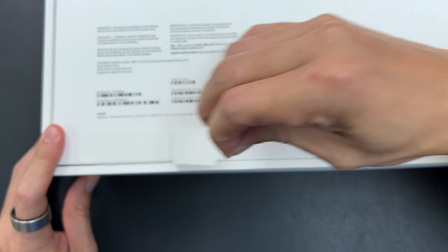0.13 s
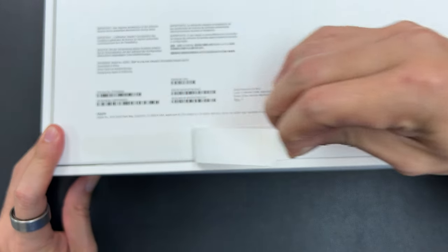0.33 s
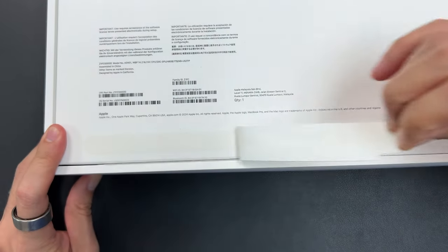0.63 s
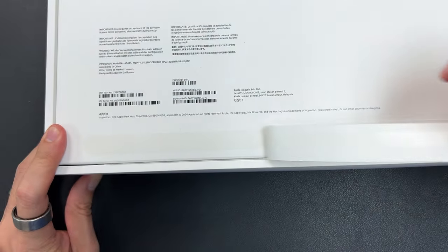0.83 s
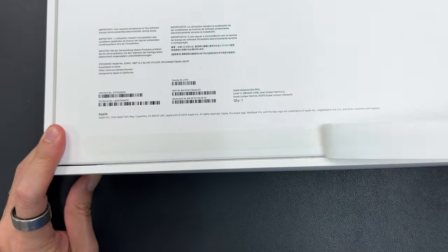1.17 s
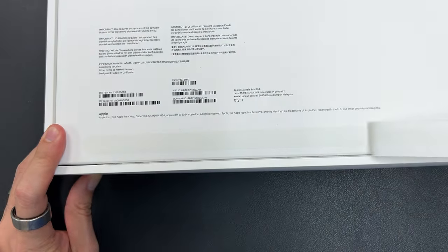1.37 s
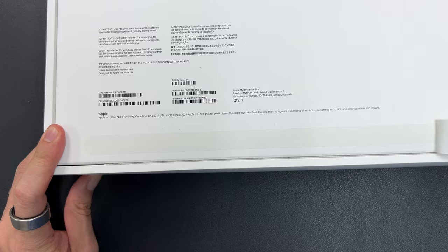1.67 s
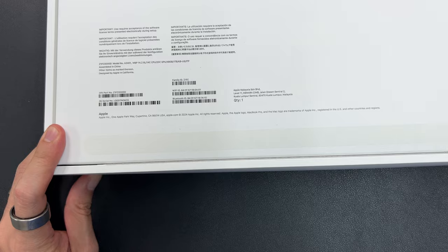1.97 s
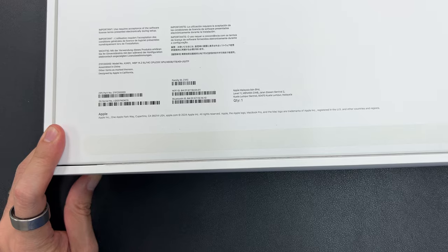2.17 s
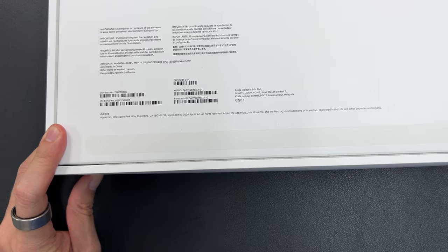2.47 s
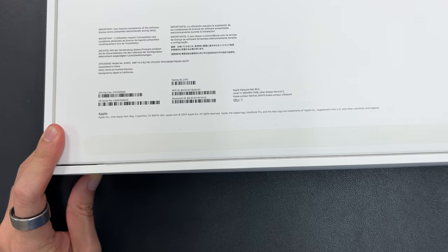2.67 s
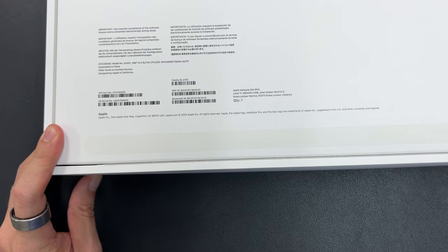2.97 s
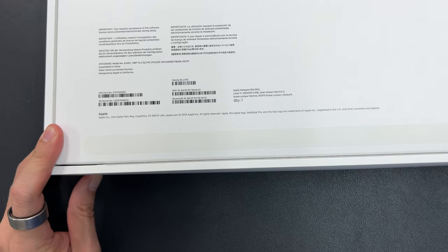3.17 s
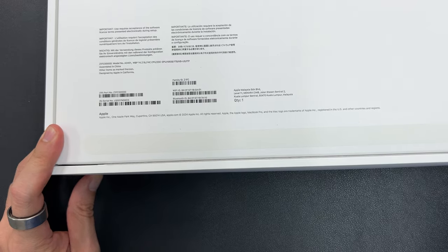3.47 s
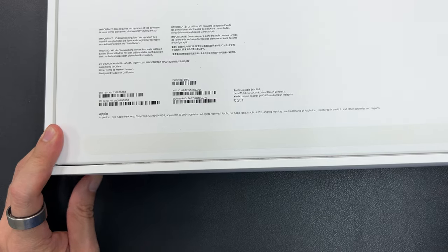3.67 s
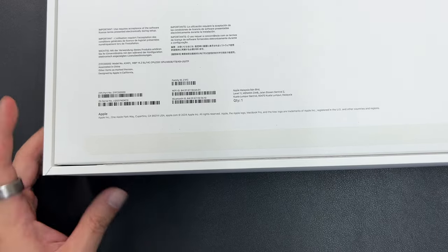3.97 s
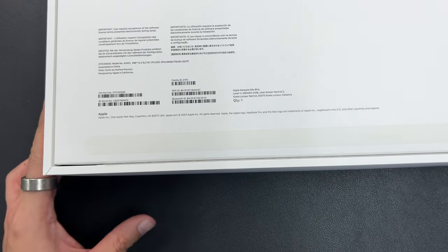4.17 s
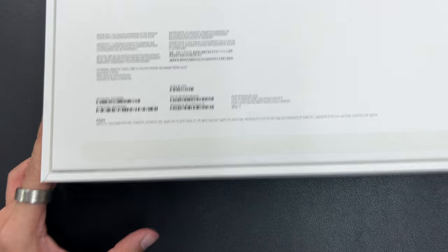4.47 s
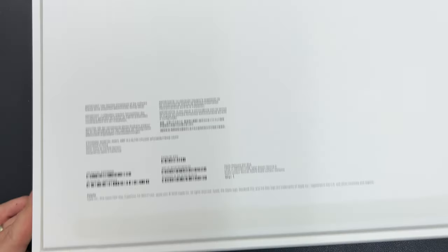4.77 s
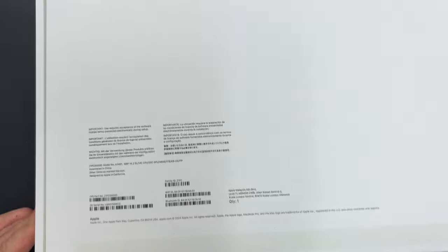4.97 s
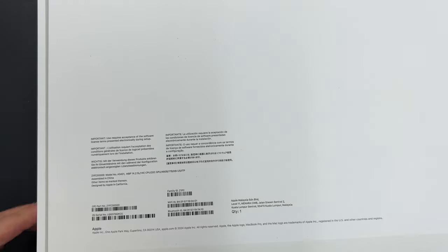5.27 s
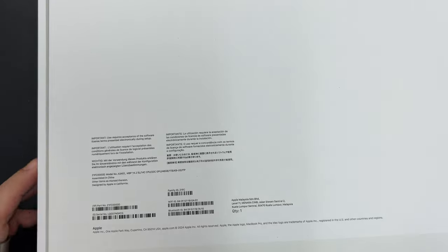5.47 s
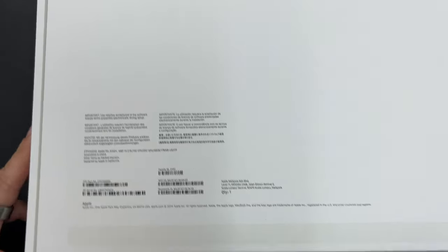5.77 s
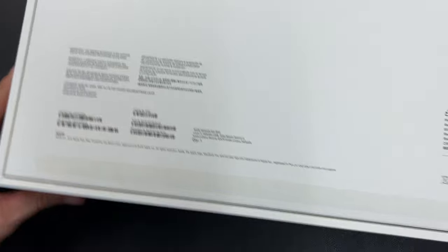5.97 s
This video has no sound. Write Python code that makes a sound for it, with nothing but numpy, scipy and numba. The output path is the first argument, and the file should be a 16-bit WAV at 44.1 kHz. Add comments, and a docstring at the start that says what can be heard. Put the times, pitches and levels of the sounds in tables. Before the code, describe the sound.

From the start, a paper tear-strip is pulled along a large cardboard box, close to the microphone. It rasps and crackles in quick, uneven slips, with a papery ring that falls in pitch as the strip lengthens and a growing hollow drumming from the lid. At about 2.3 seconds the end comes free with a sharp, bright snap. A pause of about a second follows. From 3.5 seconds fingers brush and tap the box, making light clicks and small creaks, the sharpest near 3.6 and 4.3 seconds. The box slides softly over a desk mat from about 4.4 seconds. A tiny click and faint fingertip brushes come after 5.2 seconds, then a second soft slide swells from 5.5 to about 6 seconds. Faint fan air and a low electrical hum fill the small room throughout.

```python
"""A large cardboard box on a desk mat, close to a two-port stereo microphone, in a small humming room.
First a paper tear-strip is pulled: fibres part in uneven slips that shake the lid and the lengthening
strip, until its end snaps free at 2.3 s. From about 3.5 s fingers brush, tap and shift the box, and it
slides over the mat at 4.4 s and again at 5.5 s. Fan air and mains hum lie underneath throughout."""
import sys
import numpy as np
from scipy import signal
from scipy.fft import rfft, irfft, next_fast_len
from scipy.io import wavfile
from scipy.ndimage import uniform_filter1d
from numba import njit

SR = 44100
rng = np.random.default_rng(int(sys.argv[2]) if len(sys.argv) > 2 else 0)


def write(x):
    x = np.atleast_2d(x).T
    wavfile.write(sys.argv[1], SR, np.round(np.clip(x, -1, 1) * 32767).astype(np.int16))


N = 269495
T = np.arange(N) / SR
SIZE = next_fast_len(N + SR, real=True)
F = np.arange(SIZE // 2 + 1) * SR / SIZE + 1e-3

# how hard the hand pulls, heard as crackle: time_s, relative_db
HAND_PULL = [(0, -42), (0.24, -40.5), (0.42, -41), (0.54, -37), (0.66, -44.5), (0.84, -35.5), (0.93, -46),
             (1.0, -40), (1.08, -39.5), (1.22, -38), (1.52, -36.5), (1.7, -41.5), (1.96, -39.5),
             (2.03, -38.5), (2.14, -43.5), (2.26, -41.5), (2.295, -32.5)]
# the strongest slips of the tear: peak_s, relative_db, lid_jolt_db, treble_tilt_db
STRONG_SLIPS = [(0.0395, -34, -56, 18), (0.0494, -34, -60, 7), (0.0974, -31.5, -46, -3),
                (0.1337, -28, -55, 3), (0.1871, -30.5, -42, 8), (.222, -32, -53, 7), (0.231, -29, -62, -1),
                (0.269, -26, -64, 9), (0.327, -35, -54, 9), (0.3446, -30, -66, -8), (0.4516, -35, -64, -5),
                (0.491, -30.5, -54, -8), (0.5256, -26, -58, -3), (0.534, -32, -60, -2),
                (0.5546, -25, -43, 2), (0.5638, -26, -42, 4), (0.5977, -24, -49, 7), (0.604, -26, -44, 0),
                (0.623, -35, -62, 9), (0.6767, -28.5, -60, -2), (0.7276, -26, -38, 0),
                (0.7562, -24, -64, 3), (0.8351, -34.5, -41, -5), (0.927, -28, -70, 1),
                (1.0033, -33, -43, -8), (1.045, -30.5, -44, -8), (1.0764, -32.5, -56, -8),
                (1.0866, -28, -62, -4), (1.103, -28, -39, -1), (1.1145, -27.5, -35.5, -8.5),
                (1.1398, -23.5, -45, -7), (1.155, -33, -48, -5), (1.1694, -35, -40, -7),
                (1.1931, -33, -40.5, -13), (1.232, -32, -44, 5), (1.2535, -26.5, -56, -1),
                (1.2624, -27, -45, -4), (1.288, -30.5, -43, -1), (1.3129, -27.5, -52, -5),
                (1.3267, -26, -50, 5), (1.348, -34.5, -48, -12), (1.4148, -25, -39, 4),
                (1.421, -26, -39, -9), (1.4543, -24, -36, 2), (1.5033, -32, -37.5, -13),
                (1.508, -34, -47, 0), (1.5383, -31.5, -54, 3), (1.5803, -29.5, -39.5, -8),
                (1.588, -30, -56, 9), (1.614, -25.5, -49, -2), (1.6265, -30, -53, -11),
                (1.6997, -25.5, -42.5, -1), (1.7178, -32, -43, -3), (1.7451, -31, -53, -14),
                (1.7602, -26.5, -49, -1), (1.7821, -30, -54, 5), (1.7882, -34, -39.5, 10),
                (1.8405, -27, -38.5, 0), (1.9195, -32, -61, -5), (1.9683, -32, -59, -7),
                (1.9872, -25, -40, -5), (2.0203, -30, -51, 3), (2.0311, -26, -41, -6),
                (2.038, -26, -41, -9), (2.0453, -30, -37, -1), (2.0734, -27, -45, -2),
                (2.0824, -32, -52, 3), (2.1112, -31, -41, -5), (2.241, -28, -46, 5), (2.2788, -28, -47, 1)]
# tone of the snapping fibres: frequency_hz, gain_db
FIBRE_SPECTRUM = [(300, -2), (1000, -9.5), (1750, -5.5), (2200, -0.5), (2900, -5.5), (3400, -0.5),
                  (4100, -4), (5800, -4.5), (8000, -3), (11000, -7), (15500, -2.5)]
# the paper's top hiss, highest while the strip runs fastest: time_s, gain_db
PAPER_SHEEN = [(0, 2.5), (.9, -3), (1.1, 5), (1.5, 0.5), (1.8, -1.5)]
# resonances of the paper wrap: pitch_hz, width_hz, gain_db
WRAP_MODES = [(2140, 110, -8.5), (2810, 72, 0.5), (3360, 410, 2), (4150, 75, -11), (4870, 66, -8),
              (8300, 160, -14)]
# how freely the wrap rings, dipping as the tear nears the corner: time_s, gain_db
WRAP_RING = [(0, -12), (.5, 3.5), (1.55, 3.5), (1.7, -29), (2.3, 3)]
# the freed strip rings lower as it lengthens: time_s, pitch_hz, gain_db
STRIP_GLIDE = [(0, 2110, -50), (.55, 1650, -21.5), (.85, 1250, -21.5), (1.13, 980, -19.5), (1.3, 1000, -11),
               (1.42, 670, -15.5), (1.58, 535, -20), (1.72, 365, -24.5), (2.3, 355, -17)]
# the strip's edge sings, most strongly near the end of its run: time_s, pitch_hz, gain_db
EDGE_GLIDE = [(0.4, 4250, -24), (.6, 4500, -14.5), (1.55, 4480, -26), (1.74, 4540, -3.5), (1.9, 4800, -23),
              (2.0, 5470, -8.5), (2.2, 5300, -8), (2.27, 4540, -4)]
# the lid and the air behind it: pitch_hz, width_hz, gain_db
LID_MODES = [(310, 18, -19), (371.5, 76, 5), (515, 150, 1), (850, 75, -5), (1100, 1200, -3),
             (1596, 75, 2.5)]
# the strip's end tugs the lid and snaps free; a short, bright tail follows:
# start_s, force_db, low_hz, high_hz, crunch_decay_s, body_gain_db
RELEASE_SNAPS = [(2.2878, -13, 900, 5000, 0.003, 2), (2.296, -5.5, 3400, 5000, 0.0086, -6),
                 (2.3027, 2.5, 3930, 19500, 0.00025, -17.5), (2.314, -22.5, 3300, 6000, 0.008, 4),
                 (2.3185, -3.5, 3300, 7900, 0.045, -8)]
# the strip's free end: pitch_hz, width_hz, gain_db
STRIP_END_MODES = [(3690, 770, 8.5), (4730, 130, 7)]
# the box corner where the strip lets go: pitch_hz, width_hz, gain_db
CORNER_MODES = [(310, 130, 14.5), (486, 100, 3), (790, 140, 12), (940, 140, 8), (1300, 230, -5),
                (2080, 220, -0.5)]
# taps and creaks of the box: start_s, force_db, low_hz, high_hz, crunch_decay_s, body_gain_db
BOX_TAPS = [(3.6067, -15.5, 2300, 12000, 0.0013, 8), (3.6137, -24.5, 2510, 13000, 0.0012, 2),
            (3.656, -35, 3500, 15000, .001, -1), (3.7542, -18, 5170, 8700, 0.0036, -30),
            (3.7612, -36, 4970, 8950, .003, -25), (3.7785, -40, 5000, 9000, .002, -25),
            (3.8752, -35.5, 3970, 12000, 0.0027, 8), (4.066, -34.5, 1800, 9000, 0.0024, -29),
            (4.2075, -34, 1500, 4500, 0.0011, 7), (4.2203, -17.5, 1200, 2600, 0.0025, -7),
            (4.2333, -33, 2000, 10000, 0.0017, 3), (4.244, -33, 900, 2000, 0.0018, 16.5),
            (4.2603, -6, 2870, 9600, 0.0011, 1.5), (4.3325, -27.5, 1530, 14000, 0.0016, 9.5),
            (4.4088, -32, 900, 7900, 0.0018, 16), (4.4135, -36.5, 900, 7900, .0015, 22),
            (5.2372, -35.5, 3020, 15100, 0.0026, 6.5)]
# the stiff card edge: pitch_hz, width_hz, gain_db
CARD_MODES = [(2480, 1700, 8), (3290, 120, -6), (4470, 1100, 5), (5390, 740, 0), (7100, 740, -2)]
# the hollow box, knocked at its rim: pitch_hz, width_hz, gain_db
RIM_MODES = [(333, 25, 7), (424, 22, 15), (604, 33, 8), (766, 47, 14), (987, 140, 5), (1360, 520, -1),
             (2010, 750, -7)]
# the box slides on the mat: start_s, fastest_s, relative_db
BOX_SLIDES = [(4.382, 4.64, -49.5), (5.528, 6.032, -49.5)]
# tone of card rubbing on the mat: frequency_hz, gain_db
RUB_SPECTRUM = [(300, -7), (800, -10.5), (1500, -10.5), (2150, -14), (2550, -8.5), (2850, -6), (3300, -8.5),
                (6000, -12.5), (9000, -17.5), (12000, -23), (15500, -12.5)]
# fingertips brush the card: middle_s, level_db, swell_and_fade_s
FINGER_BRUSHES = [(3.45, -62.5, .016), (5.32, -62, 0.048), (5.58, -63.5, 0.052), (6.08, -57, 0.11)]
# tone of the room's moving air: frequency_hz, gain_db
AIR_SPECTRUM = [(20, -20), (45, -14), (65, -5.5), (140, -8.5), (300, -11.5), (500, -20), (1000, -25.5),
                (2000, -37), (3950, -43), (4280, -32), (4650, -47.5), (7800, -36.5), (9300, -52.5),
                (15500, -54.5)]
# fan and mains hum: pitch_hz, level_db, unsteadiness (0-1)
HUM_LINES = [(65, -51, 0.41), (99.9, -47.5, 0.14), (119.5, -57.5, 0.49), (201.2, -51.5, 0.24),
             (297.7, -65.5, 0.08), (700.3, -69, 0.14)]
# diffuse sound that differs between the microphone's ports: frequency_hz, power_share (0-1)
DIFFUSE_SPREAD = [(100, .001), (220, .005), (400, .08), (750, .3), (1600, .16), (3500, .35), (7000, .15),
                  (15000, .15)]
# phase between the ports: frequency_hz, left_lead_rad
PORT_LEAD = [(0, 0), (1460, -0.4), (2760, 2.1), (5080, 1.1), (5770, 2.9), (7670, 6.0), (8610, 6.8),
             (9730, 8.3), (10900, 10.5), (12100, 12.4), (12900, 12.8), (14600, 15.5), (15600, 16.5),
             (17200, 15.2)]
# balance between the ports: frequency_hz, left_minus_right_db
PORT_BALANCE = [(400, 0), (1500, -.5), (2300, -3), (4500, -2), (6500, .5), (15000, 0)]


def tear(lid_db=-6, overtone_db=-5, sway_s=0.008, scatter=0.38):
    """The strip lets go in bursts of snapping fibres; the same tugs drive its edge, length and the lid."""
    pull_db = curve(HAND_PULL)
    slip_power, jolt_power, cracks, tilt, stuck = strong_slips()
    crackle_power = small_slips(pull_db, stuck)
    effort = np.sqrt(crackle_power + slip_power)
    tilt_db = tilt / (effort ** 2 + 1e-12)
    # the wide lid radiates a little differently towards each port
    snaps = grains(rate=4500, spread_db=1.5) + scatter * rng.standard_normal((2, N))
    crackle = fibre_crackle(snaps * effort + cracks, tilt_db)
    edge = gliding_ring(snaps, EDGE_GLIDE, q=5.5) * effort
    # the lid drums more the harder the pull and the nearer the tear comes to the free corner
    drum = undb(-18.5 + 0.4 * (pull_db - pull_db.max()) + 7.5 * T)
    tug = np.sqrt(crackle_power * drum ** 2 + jolt_power)
    lid_response = unit(resonances(LID_MODES) / (1 + 1j * F / 550))
    lid = through(snaps * tug, lid_response) * undb(lid_db)
    # the loose strip rings on between slips
    sway = np.sqrt(np.abs(uniform_filter1d(effort ** 2 + jolt_power, int(sway_s * SR))))
    strip = gliding_ring(snaps, STRIP_GLIDE, q=7.5)
    strip += undb(overtone_db) * gliding_ring(snaps, STRIP_GLIDE, q=7.5, multiple=2.05)
    return crackle + edge + lid + strip * sway


def strong_slips(burst_db=-8.5, crack_db=7, jolt_db=4, stick_s=0.014):
    """The strip holds fast for a moment, then a whole fibre bundle breaks and jolts the lid."""
    power, jolts, cracks, tilts, stuck = np.zeros((5, N))
    for peak_s, db, lid_db, treble_db in STRONG_SLIPS:
        peak = int(peak_s * SR)
        power[peak] = undb(db + burst_db) ** 2
        jolts[peak] = undb(lid_db + jolt_db) ** 2
        cracks[peak] = undb(db + crack_db)
        tilts[peak] = power[peak] * treble_db
        stuck[max(peak - int(stick_s * SR), 0):peak] = 1
    return np.abs(bursts(power)), np.abs(bursts(jolts)), cracks, bursts(tilts), stuck


def small_slips(pull_db, stuck, gap_s=0.008, uneven_db=4, creep=0.14, crackle_db=-7, stick_db=-2):
    """Power of the crackle: tension must build after each slip, so gaps are uneven but bounded."""
    gap_draw, size_draw = rng.random((2000, 2)).T
    starts = (np.cumsum(gap_s * (1.5 * gap_draw + .25)) * SR).astype(int)
    sizes = undb(uneven_db * (2 * size_draw - 1))
    slips = np.abs(bursts(np.bincount(starts, sizes ** 2, minlength=N)[:N]))
    drive = undb(pull_db + crackle_db + stick_db * stuck)
    tearing = T < 2.303
    return (creep + slips / slips[:SR].mean()) * drive ** 2 * tearing


def bursts(peaks, swell_s=0.00076, fall_s=0.0016):
    """Each slip's power swells quickly and falls a little more slowly."""
    half = SR // 50
    age = np.arange(-half, half + 1) / SR
    return signal.fftconvolve(peaks, np.exp(-np.maximum(-age / swell_s, age / fall_s)), "same")


def fibre_crackle(snaps, tilt_db, treble_hz=6000, sheen_hz=10000, fibres_db=-2.5):
    """Breaking fibres ring the paper wrap; thin bundles snap brighter, thick ones duller."""
    fibres = through(snaps, unit(colour(FIBRE_SPECTRUM))) * undb(fibres_db)
    treble = through(fibres, 1 / (1 + (treble_hz / F) ** 6))
    bright = undb(tilt_db / 2)
    fibres = treble * bright + (fibres - treble) / bright
    sheen = through(fibres, 1 / (1 + (sheen_hz / F) ** 8))
    fibres += sheen * (undb(curve(PAPER_SHEEN)) - 1)
    wrap = through(fibres * undb(curve(WRAP_RING)), resonances(WRAP_MODES))
    return shimmer(fibres + wrap)


def shimmer(x, depth_db=3, rate_hz=45, count=20):
    """Each band's level flickers quickly on its own, giving the crackle a patchy, shifting colour."""
    place = np.interp(np.log(F), np.log([1000, 15000]), [0, count - 1])
    bands = (through(x, np.maximum(1 - np.abs(place - k), 0)) for k in range(count))
    return sum(band * undb(depth_db * walk(rate_hz)) for band in bands)


def gliding_ring(snaps, glide, q, multiple=1):
    """Fibre snaps ring a resonance of the strip that follows (time_s, pitch_hz, gain_db) points."""
    glide = np.array(glide, float)
    pitch_hz, gain_db = curve(glide[:, :2]), curve(glide[:, ::2])
    ring = gliding_band(snaps.mean(axis=0), multiple * pitch_hz, multiple * q)
    return unit(ring) * undb(gain_db)


def knocks(rows, edge_modes, body_modes, crunch, body_hz=2600):
    """A sharp crack with a brief crunch rings a card edge and the hollow body behind it."""
    cracks, thumps = np.zeros((2, N))
    age = T[:SR // 5]
    for start_s, force_db, low_hz, high_hz, decay_s, body_db in rows:
        force = crunch * rng.standard_normal(len(age)) * np.exp(-age / decay_s)
        force[0] = 1
        force *= undb(force_db) / np.sqrt(np.sum(force ** 2))
        low_cut = signal.butter(2, low_hz, "high", fs=SR, output="sos")
        high_cut = signal.butter(2, high_hz, "low", fs=SR, output="sos")
        span = slice(int(start_s * SR), int(start_s * SR) + len(age))
        cracks[span] += signal.sosfilt(np.vstack([low_cut, low_cut, high_cut]), force)
        thumps[span] += force * undb(body_db)
    edge = through(cracks, 1 + resonances(edge_modes))
    body = through(thumps, resonances(body_modes) / (1 + 1j * F / body_hz))
    return edge + body


def box_slides(gather_db=12.5, loosen_db_per_s=257, coast_db_per_s=41, slide_db=-3, scrape_db=-7):
    """The box breaks loose, gathers speed and coasts to rest, rubbing the mat in fine friction grains."""
    speed = np.zeros(N)
    for start_s, fastest_s, db in BOX_SLIDES:
        gather = np.interp(T, [start_s, fastest_s], [db - gather_db, db])
        loosen = loosen_db_per_s * np.maximum(start_s - T, 0)
        coast = coast_db_per_s * np.maximum(T - fastest_s, 0)
        speed += undb(gather - loosen - coast)
    push = speed * undb(slide_db + 1.5 * walk(33))
    friction = grains(rate=22000, spread_db=-6) + 0.025 * rng.standard_normal((2, N))
    rub = through(friction, colour(RUB_SPECTRUM))
    # the edge catches on the mat's texture
    scrape = through(grains(rate=900, spread_db=4), resonances([(1480, 570, 0)]))
    return (unit(rub) + unit(scrape) * undb(scrape_db)) * push


def finger_brushes(skin_hz=11000, width_hz=9000):
    """Fingertips pass over smooth card: dense friction grains make a faint, high hiss."""
    touch = sum(undb(db) * np.exp(-np.abs(T - s) / fade_s) for s, db, fade_s in FINGER_BRUSHES)
    skin = through(grains(rate=41000, spread_db=10), resonances([(skin_hz, width_hz, 0)]))
    return unit(skin) * touch


def room(x, t60_s=0.32, treble_t60_s=0.37, build_s=0.0036, early_db=-3, early_s=0.0011, dull_hz=10000):
    """Desk and box reflect at once; then the near walls build a short, dense tail with a softened top."""
    noise = diffuse()
    treble = through(noise, 1 / (1 + (dull_hz / F) ** 6))
    walls = (noise - treble) * undb(-60 * T / t60_s) + treble * undb(-60 * T / treble_t60_s)
    build = (1 - np.exp(-(T / build_s) ** 2)) ** 2
    early = noise * undb(early_db) * np.exp(-T / early_s)
    tail = early + walls * build
    tail /= np.sqrt(np.sum(tail ** 2) / 2)
    return through(x, rfft(tail, SIZE) / (1 + 1j * F / dull_hz))


def ventilation(air_db=-48, flicker_db=0.5):
    """Room tone: the rumble and hiss of moving air, with the wavering hum of a fan and the mains."""
    air = unit(through(diffuse(), undb(spectrum(AIR_SPECTRUM))))
    air *= undb(air_db + flicker_db * walk(2.6))
    for hz, db, unsteady in HUM_LINES:
        waver = (1 - unsteady) + unsteady * (walk(1.7) + 1j * walk(13))
        air += undb(db) * unit(np.real(waver * np.exp(2j * np.pi * hz * T)))
    return air


def diffuse():
    """White noise from all around: alike at both ports in the bass, less so above."""
    share = np.clip(spectrum(DIFFUSE_SPREAD), 0, 1)
    mid, side = (through(rng.standard_normal(N), np.sqrt(w)) for w in (1 - share, share))
    return np.array([mid + side, mid - side])


def grains(rate, spread_db):
    """Tiny clicks of uneven size, about rate a second, rms 1."""
    size = undb(spread_db * np.minimum(rng.standard_normal(N), 2))
    return unit((rng.random(N) < rate / SR) * size * rng.choice([-1, 1], N))


def walk(rate_hz):
    """Smooth random drift, rms 1."""
    return unit(through(rng.standard_normal(SIZE), np.exp(-(F / rate_hz) ** 2)))


def undb(db):
    """Decibels to gain."""
    return 10 ** (np.asarray(db) / 20)


def unit(x):
    """Scale a signal or a response to rms 1."""
    return x / np.sqrt(np.mean(np.abs(x) ** 2))


def curve(points):
    """(time_s, value) points joined at every sample."""
    return np.interp(T, *np.transpose(points))


def spectrum(points):
    """(frequency_hz, value) points joined on a log axis."""
    hz, value = np.transpose(points)
    return np.interp(np.log(F), np.log(hz), value)


def through(x, response):
    """Filter by a frequency response."""
    return irfft(rfft(x, SIZE) * response, SIZE)[..., :N]


def colour(points):
    """Causal response through (frequency_hz, gain_db) points."""
    cepstrum = irfft(np.log(undb(spectrum(points))), SIZE)
    cepstrum[1:SIZE // 2] *= 2
    cepstrum[SIZE // 2 + 1:] = 0
    return np.exp(rfft(cepstrum))


def resonances(modes):
    """Summed response of (pitch_hz, width_hz, gain_db) modes."""
    return sum(undb(db) / (1 + 1j * (F / hz - hz / F) * hz / width) for hz, width, db in modes)


@njit
def gliding_band(x, hz, q):
    """State-variable band-pass whose centre moves; q is centre over width."""
    y = np.empty(len(x))
    band_state, low_state = 0., 0.
    for i in range(len(x)):
        g = np.tan(np.pi * hz[i] / SR)
        band = (band_state + g * (x[i] - low_state)) / (1 + g * (g + 1 / q))
        band_state = 2 * band - band_state
        low_state += 2 * g * band
        y[i] = band / q
    return y


def scene(tear_room_db=-8.5, release_room_db=-11, tap_room_db=-2, spill_hz=10500):
    """The box close up, the small room's answer behind it and room tone underneath."""
    rip = tear()
    release = knocks(RELEASE_SNAPS, STRIP_END_MODES, CORNER_MODES, crunch=0.36)
    taps = knocks(BOX_TAPS, CARD_MODES, RIM_MODES, crunch=0.37)
    # little of a tap's finest treble reaches the walls
    spill = through(taps, 1 / np.sqrt(1 + (F / spill_hz) ** 6))
    tail = room(rip * undb(tear_room_db) + release * undb(release_room_db) + spill * undb(tap_room_db))
    return rip + release + taps + tail + box_slides() + finger_brushes() + ventilation()


def record(dry):
    """The stereo microphone: treble reaches the left port a little early; the top is cut at 16.3 kHz."""
    lead_rad = np.interp(F, *np.transpose(PORT_LEAD))
    side = np.array([[.5], [-.5]])
    ports = through(dry, np.exp(1j * side * lead_rad) * undb(side * spectrum(PORT_BALANCE)))
    return signal.sosfilt(signal.ellip(10, .2, 80, 16300, fs=SR, output="sos"), ports)


dry = scene()
out = record(dry)
write(out)
```